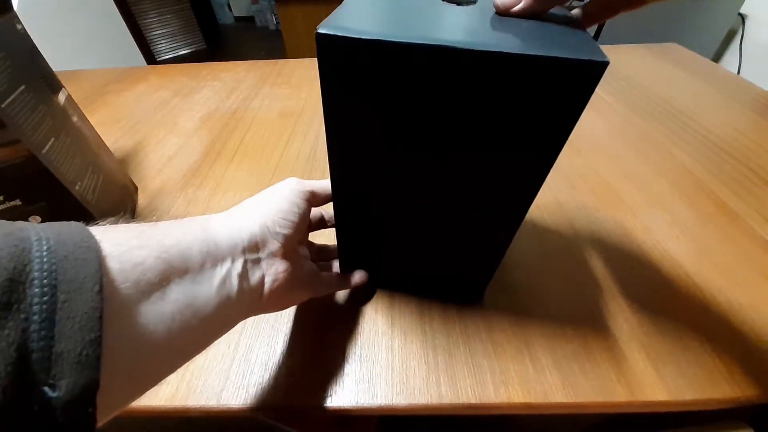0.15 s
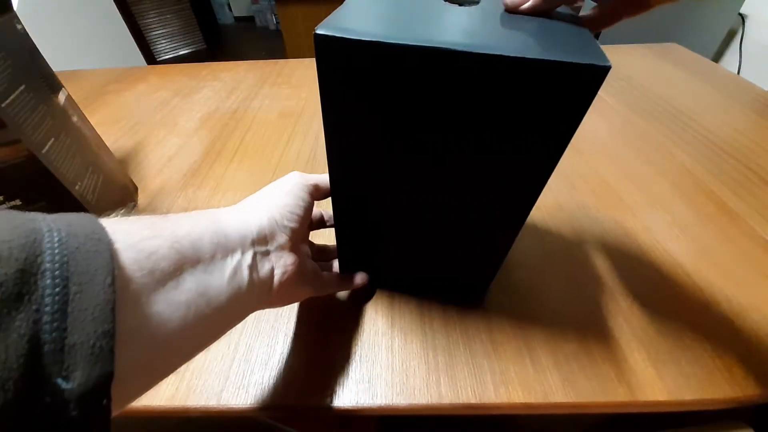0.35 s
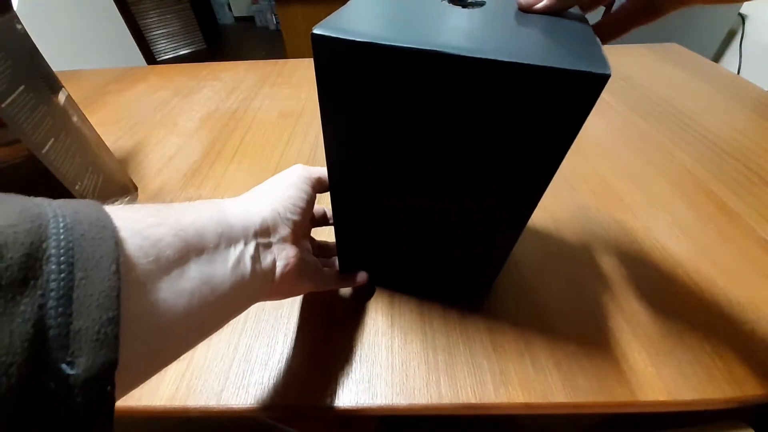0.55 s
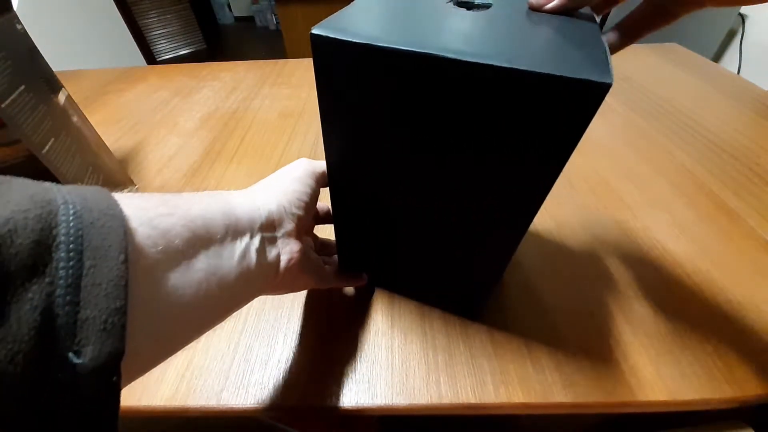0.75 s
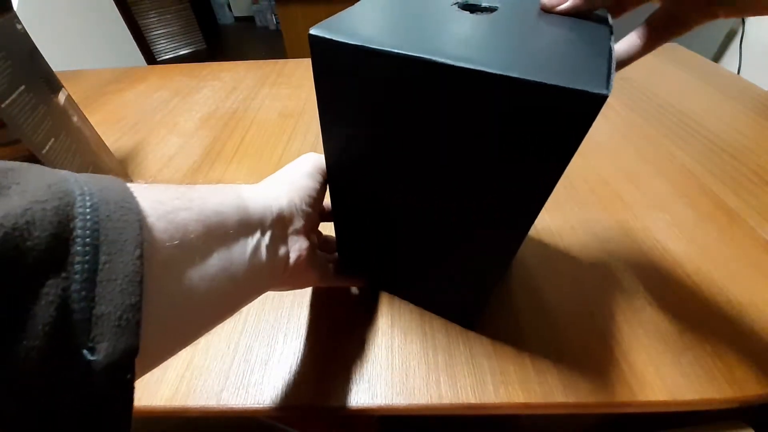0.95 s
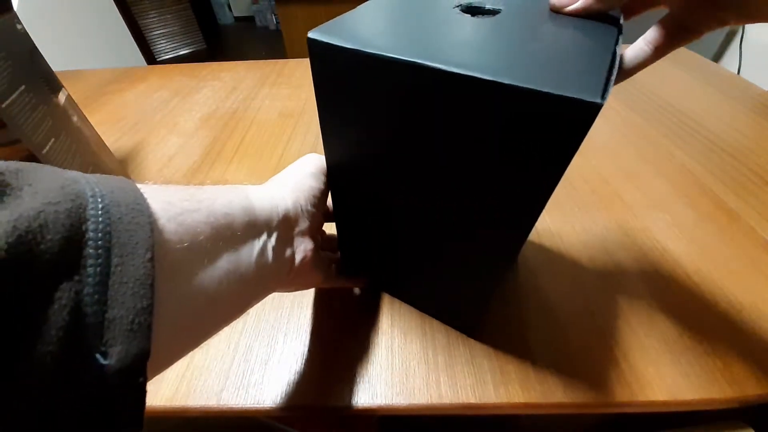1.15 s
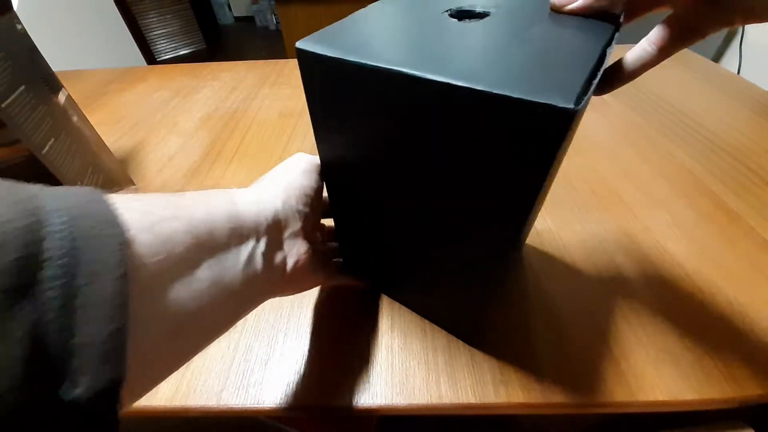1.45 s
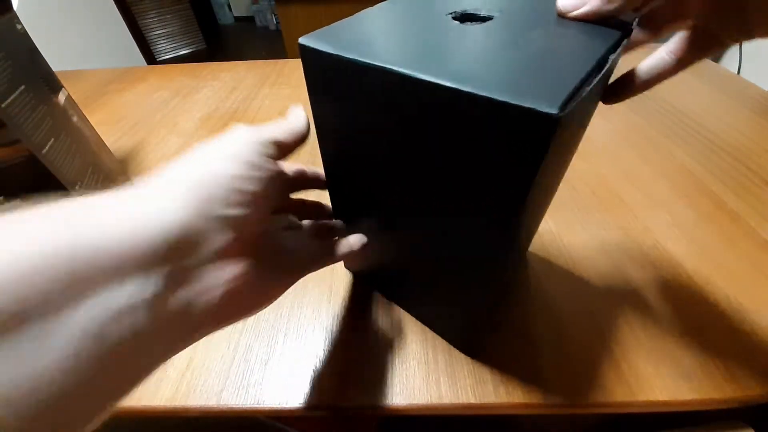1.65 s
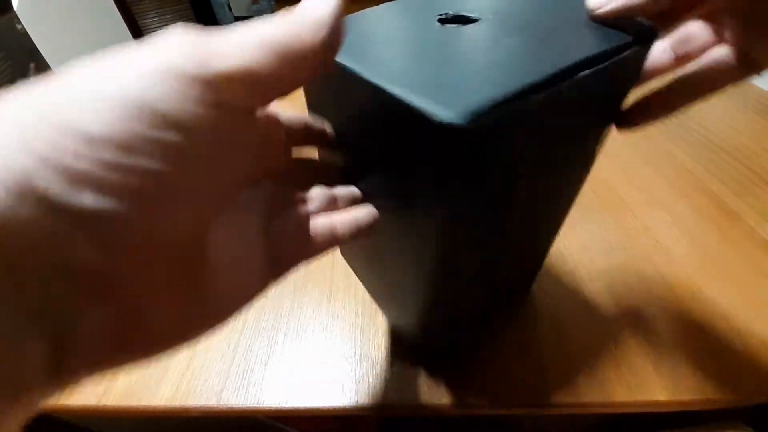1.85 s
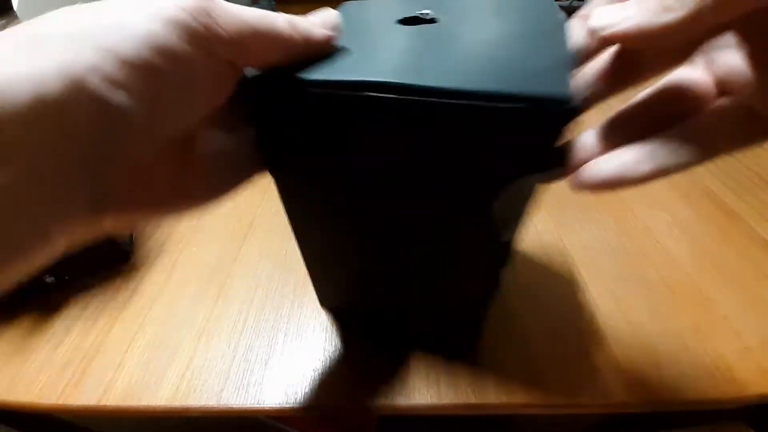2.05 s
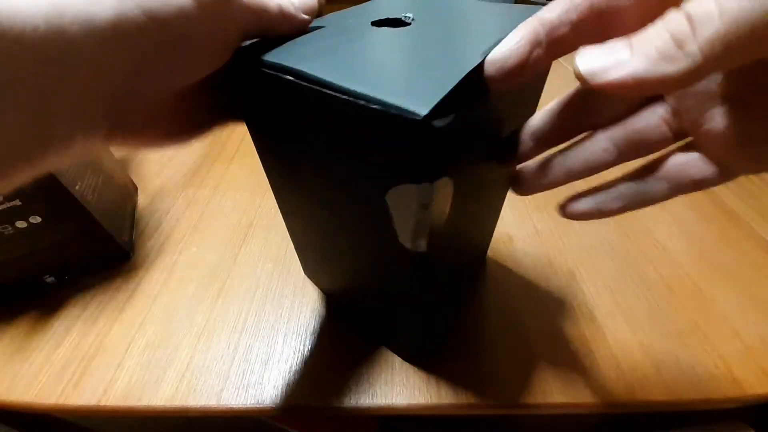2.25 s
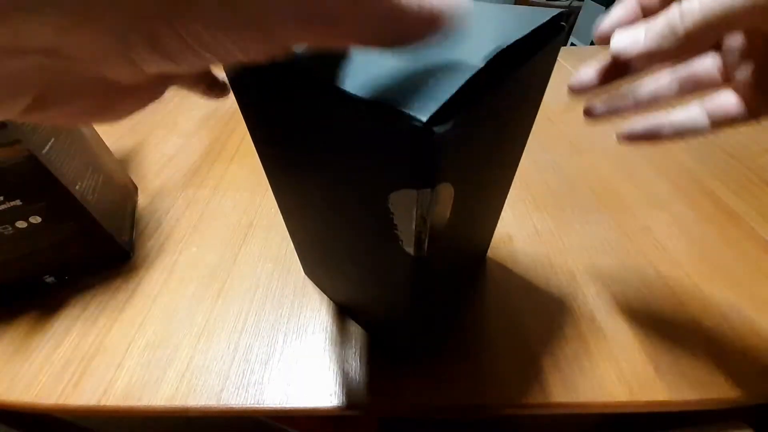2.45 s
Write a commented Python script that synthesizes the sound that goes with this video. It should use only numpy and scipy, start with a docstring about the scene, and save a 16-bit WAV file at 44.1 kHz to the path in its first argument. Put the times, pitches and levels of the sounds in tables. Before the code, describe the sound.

Close stereo microphone in a quiet small room: a stiff card box drags softly, knocks sharply, ticks at its edges, thuds and creaks on the table, then hands hiss across it and fade.

```python
"""A tall cardboard box is turned by hand on a wooden table, close to the microphone in a small room.
First the base drags and a hand brushes the card; then the box tips down with one sharp tap, and edges tick.
Midway the base thuds down and judders, the card creaks, and palms and fingers slide over it with a bright hiss.
A second tap and thud follow, then a last tick and fading strokes. Still air lies under it all.
Contacts are random impulses sent through the box; hisses are dense grains, thuds and creaks are sines."""
import sys
import numpy as np
from scipy import signal
from scipy.fft import rfft, irfft
from scipy.io import wavfile

SR = 44100
rng = np.random.default_rng(int(sys.argv[2]) if len(sys.argv) > 2 else 0)


def store_pcm(level_fs):
    """Save levels as 16-bit WAV."""
    pcm = np.round(np.clip(level_fs, -1, 1) * 32767).astype(np.int16)
    wavfile.write(sys.argv[1], SR, np.atleast_2d(pcm).T)


N = 114660
T = np.arange(N) / SR  # time [s]


def amp(db):
    """Decibels to gain."""
    return 10 ** (np.asarray(db) / 20)


def unit(x):
    """Scale to rms 1."""
    return x / np.sqrt(np.mean(x ** 2) + 1e-20)


def conv(x, response):
    """Pass a sound through a response, one row per channel."""
    return signal.fftconvolve(np.atleast_2d(x), np.atleast_2d(response), axes=1)[:, :N]


def colour(points, size=4096):
    """Causal (minimum-phase) response with the given spectrum, by folding the cepstrum."""
    hz, db = np.array(points, float).T
    bins = np.maximum(np.fft.rfftfreq(size, 1 / SR), 1)
    log_gain = np.log(amp(np.interp(np.log(bins), np.log(hz), db)))
    cepstrum = irfft(log_gain)
    cepstrum[1:size // 2] *= 2
    cepstrum[size // 2 + 1:] = 0
    return irfft(np.exp(rfft(cepstrum)))


def pan(db):
    """Left and right gains of constant power; db is left minus right."""
    return unit(amp(np.array([[db], [-db]]) / 2))


# how unlike the two channels are for sounds near the microphone: (frequency [Hz], side level [dB])
STEREO_WIDTH = [(100, -12), (350, -13.5), (700, -7), (1300, 1), (3000, 0.5), (16000, -1)]


def spread(middle, side):
    """Two unrelated sounds as one wide source, narrow in the bass."""
    return unit(middle + conv(side, colour(STEREO_WIDTH)) * np.array([[1], [-1]]))


def wide_noise(points):
    """Coloured stereo noise of rms 1."""
    return spread(*conv(rng.standard_normal((2, N)), colour(points)))


def grains(rate, scatter_db):
    """Random tiny impulses of either sign, rate per second, a few larger than the rest."""
    size = amp(scatter_db * np.minimum(rng.exponential(size=N), 4))
    present = rng.random(N) < rate / SR
    return present * size * rng.choice([-1, 1], N)


def walk(rate):
    """Random wander, with a spread near 1, along straight lines between rate new values per second."""
    return np.interp(T * rate, np.arange(N), rng.standard_normal(N))


def swell(at, rise, fall, shape=1.76):
    """Envelope that grows to a peak and dies away."""
    return np.exp(-(np.abs(T - at) / np.where(T < at, rise, fall)) ** shape)


# panel resonances of the box: (frequency [Hz], time to fall 60 dB [s], relative level [dB])
PANEL_MODES = [(160, 0.061, -3), (241.4, 0.083, -3.5), (318.7, 0.085, -3), (482, 0.073, -10.5),
               (568, 0.034, -2), (735, 0.022, -1), (940, 0.018, -14), (1273, 0.036, -1), (1686, 0.036, 0),
               (2215, 0.056, -2.5)]
PANEL_RING_DB = -35.5


def box(points, size=8192):
    """Response of the box to one contact: the push itself plus ringing panels."""
    t = T[:size]
    modes = sum(amp(db - 60 * t / t60) * np.cos(2 * np.pi * hz * t) for hz, t60, db in PANEL_MODES)
    response = amp(PANEL_RING_DB) * modes / 2
    response[0] += 1  # the push
    return conv(response, colour(points))[0, :size]


# spectrum of the still air in the room: (frequency [Hz], level [dB])
AIR_SPECTRUM = [(20, -16), (130, -5), (550, 10.5), (1100, -30), (4000, -32), (10000, -25), (16000, -16)]
AIR_DB = -67


def still_air():
    """Steady faint noise of the air around the microphone."""
    return amp(AIR_DB) * wide_noise(AIR_SPECTRUM)


# drag of the base over the table, before its random wander: (time [s], level [dB])
DRAG_LEVEL = [(0, -50), (.07, -58), (.115, -69), (.17, -49.5), (.43, -48.5), (.52, -50.5), (.6, -44),
              (.69, -55.5), (.81, -48), (.87, -56.5), (.96, -54.5), (1.13, -62), (1.31, -58), (1.38, -49.5),
              (1.46, -58), (1.6, -42), (1.7, -56), (1.88, -46.5), (1.99, -37.5), (2.08, -44.5),
              (2.22, -49.5), (2.3, -49), (2.38, -70.5)]
# spectrum of one catch of the base: (frequency [Hz], level [dB])
DRAG_SPECTRUM = [(30, -41), (65, -5.5), (170, -1), (300, 0), (420, -3), (620, 0), (950, -6), (2000, -15),
                 (7000, -36), (16000, -42)]
CATCHES_PER_S, CATCH_SCATTER_DB, DRAG_PAN_DB = 900, 2, -2
DRAG_WANDER_DB, DRAG_WANDER_PER_S = 2.85, 44.84


def drag():
    """The base catches and lets go hundreds of times a second, shaking the panels."""
    middle, side = (conv(grains(CATCHES_PER_S, CATCH_SCATTER_DB), box(DRAG_SPECTRUM)) for _ in range(2))
    level_db = np.interp(T, *np.array(DRAG_LEVEL).T) + DRAG_WANDER_DB * walk(DRAG_WANDER_PER_S)
    return spread(middle, side) * pan(DRAG_PAN_DB) * amp(level_db)


HAND_ECHO_S, HAND_ECHO_GAIN, HAND_WANDER = .0009, .5, .15  # typical lag, gain, wander of log lag


def hand_echo(x):
    """Sound bounces between card and moving hand, so its colour keeps shifting."""
    lags = HAND_ECHO_S * np.exp(HAND_WANDER * np.array([walk(10), walk(10)]))
    echo = np.array([np.interp(T - lag, T, side) for lag, side in zip(lags, x)])
    return unit(x + HAND_ECHO_GAIN * echo)


# hand strokes on the card, before flutter; the rasp is panned half as far as the hiss:
# (peak time [s], rise [s], fall [s], hiss level [dB], rasp level [dB], hiss left minus right [dB])
HAND_STROKES = [(.0, .02, 0.055, -56, -62.5, 0), (.56, 0.32, 0.14, -52, -58.5, -7),
                (.79, 0.08, 0.1, -53, -63.5, -5.5), (1.0, 0.11, 0.19, -57, -60, -7),
                (1.27, 0.028, 0.04, -69, -60, -16), (1.347, 0.006, 0.055, -47.5, -49, -3),
                (1.572, 0.11, 0.13, -41, -44.5, -0.5), (1.665, 0.0082, 0.016, -40.5, -53, 3),
                (1.764, 0.051, 0.093, -34, -41.5, 3), (2.008, 0.12, 0.093, -31, -45.5, 3.5),
                (2.171, 0.21, 0.07, -43.5, -43, -1.5), (2.334, 0.024, 0.022, -39, -55, 1),
                (2.38, 0.67, 0.18, -48, -70, 1.5), (2.535, 0.037, 0.056, -44, -65.5, -1),
                (2.595, .012, .02, -51, -55, -4)]
# spectrum of the fine hiss of the fibres: (frequency [Hz], level [dB])
HISS_SPECTRUM = [(200, -28), (2000, -22), (4400, -4), (6000, -8), (7400, -9), (8700, 1), (10300, -2),
                 (13000, 2.5), (16000, -3)]
# spectrum of the lower rasp: (frequency [Hz], level [dB])
RASP_SPECTRUM = [(80, -26), (300, -3.5), (600, 5), (1000, -0.5), (2500, 4), (3300, -5), (4500, -10.5),
                 (16000, -19)]
FIBRES_PER_S, FIBRE_SCATTER_DB, FLUTTER_DB = 30000, 0.5, 0.9
RASP_GRAINS_PER_S, RASP_SCATTER_DB = 2000, 3


def rubbed_card(rate, scatter_db, points):
    """Fibres plucked at random over a wide patch of card, heard past the moving hand."""
    middle, side = (conv(grains(rate, scatter_db), colour(points)) for _ in range(2))
    return hand_echo(spread(middle, side))


def strokes():
    """Skin plucks the fibres of the card: a fine hiss, and a lower, grainier rasp when it presses."""
    hiss = rubbed_card(FIBRES_PER_S, FIBRE_SCATTER_DB, HISS_SPECTRUM)
    rasp = rubbed_card(RASP_GRAINS_PER_S, RASP_SCATTER_DB, RASP_SPECTRUM)
    hiss_power = rasp_power = 0
    for at, rise, fall, hiss_db, rasp_db, pan_db in HAND_STROKES:
        speed = swell(at, rise, fall)
        hiss_power = hiss_power + (speed * amp(hiss_db) * pan(pan_db)) ** 2
        rasp_power = rasp_power + (speed * amp(rasp_db) * pan(pan_db / 2)) ** 2
    rubbing = hiss * np.sqrt(hiss_power) + rasp * np.sqrt(rasp_power)
    return rubbing * amp(FLUTTER_DB * walk(90))


ROOM_T60_S, ROOM_ONSET_S = 0.45, 0.01


def reflections(envelope):
    """Diffuse stereo response of unit energy per channel, building up over the onset time."""
    tail = spread(*rng.standard_normal((2, N))) * envelope * (1 - np.exp(-T / ROOM_ONSET_S))
    return tail / np.sqrt(np.sum(tail ** 2) / 2)


def wall_tail():
    """Reflections from the walls of the small room, dying away evenly in decibels."""
    return reflections(amp(-60 * T / ROOM_T60_S))


def room(x, db=-15):
    """A short diffuse tail from the walls."""
    return amp(db) * conv(x.mean(axis=0), wall_tail())


KNOCK_CYCLES, KNOCK_FOCUS_DB = 1, 3.5  # decay and strength of the struck spot


def knock(hz, body, size=4096):
    """The struck spot rings for about a cycle at its own pitch and shakes the whole box; peak 1."""
    cycles = T[:size] * hz
    spot = np.exp(-cycles / KNOCK_CYCLES)
    push = 2 * amp(KNOCK_FOCUS_DB) * spot / spot.sum() * np.cos(2 * np.pi * cycles)
    push[0] += 1
    sound = conv(push, body)
    return sound / np.abs(sound).max()


CLICK_DECAY_S, CLICK_SPLINTER = .0004, .5


def edge_crack():
    """The stiff edge gives one impulse and a splintering burst of noise; unit energy per channel."""
    decay = np.exp(-np.minimum(T / CLICK_DECAY_S, 20))
    crack = CLICK_SPLINTER * rng.standard_normal((2, N)) * decay
    crack[:, 0] = 1
    return crack / np.sqrt(np.sum(crack ** 2, axis=1, keepdims=True))


# blows on the box, direct sound before panning and reflections:
# (time [s], hollow knock level [dB], knock pitch [Hz], edge click level [dB], left minus right [dB])
BOX_BLOWS = [(0.1319, -36.5, 920, -70, -1), (0.1511, -27, 990, -14.5, -6.5), (0.2035, -15.5, 1290, 4, -13),
             (0.2053, -17, 553, -13, -5), (0.2985, -29.5, 507, -22.5, -7), (.425, -38, 250, -62, -7),
             (.576, -36, 400, -60, -15), (.606, -39, 300, -60, -1), (0.672, -60, 900, -26, -9),
             (0.7106, -60, 900, -22.5, -19), (0.7448, -29.5, 805, -52, -3.5), (.7769, -57, 900, -25.5, -27),
             (0.9017, -39.5, 800, -60, -2), (0.9257, -31.5, 800, -31, -2), (0.9548, -58, 900, -19, -7),
             (0.9685, -32, 860, -37, 0), (0.9903, -50, 900, -18.5, -10), (2.0004, -29.5, 298, -14.5, -15),
             (2.0337, -41, 900, -8, -22.5), (2.3643, -50, 910, -20.5, -1)]
# spectrum of the hollow knock: (frequency [Hz], level [dB])
KNOCK_SPECTRUM = [(40, -35), (150, -9), (350, 0), (560, 1.5), (850, -3), (1300, -2.5), (2200, -6),
                  (3000, -33.5), (6000, -34), (16000, -72)]
# spectrum of the edge click, relative: (frequency [Hz], level [dB])
CLICK_SPECTRUM = [(100, -13.5), (1500, -10), (4800, -8), (7000, -15), (8500, -5), (10700, 1), (12500, -4),
                  (16000, -8)]
SCATTER_DECAY_S = 0.0044  # early reflections from the table and nearby boxes
CLICK_SCATTER_DB, KNOCK_SCATTER_DB = -8.5, -9
CLICK_ROOM_DB, KNOCK_ROOM_DB = -12, -11.5


def blows():
    """Each blow gives a hollow knock and a brief crack of the stiff edge, scattered by the table and the walls."""
    body, edge = box(KNOCK_SPECTRUM), colour(CLICK_SPECTRUM)
    early, late = reflections(np.exp(-T / SCATTER_DECAY_S)), wall_tail()
    around_knock = signal.unit_impulse(N) + amp(KNOCK_SCATTER_DB) * early
    around_click = amp(CLICK_SCATTER_DB) * early + amp(CLICK_ROOM_DB) * late
    knocks, clicks = np.zeros((2, 2, N))
    for at, knock_db, hz, click_db, pan_db in BOX_BLOWS:
        i = int(at * SR)
        click = pan(pan_db) * edge_crack() + around_click
        clicks[:, i:] += amp(click_db) * click[:, :N - i]
        surroundings = pan(pan_db) * around_knock + amp(KNOCK_ROOM_DB) * late
        hollow = conv(surroundings[:, :SR // 2], knock(hz, body))[:, :N - i]
        knocks[:, i:i + hollow.shape[1]] += amp(knock_db) * hollow
    return knocks + conv(clicks, edge / np.sqrt(np.sum(edge ** 2)))


# rumble of the table top under shifting weight: (peak time [s], rise [s], fall [s], level [dB])
TABLE_BUMPS = [(1.46, 0.091, 0.12, -53), (2.01, 0.025, .04, -60)]
# spectrum of the rumble: (frequency [Hz], level [dB])
BUMP_SPECTRUM = [(20, -20), (38, 0), (68, -1), (120, -3), (220, -18), (1600, -75)]


def bumps():
    """Shifting weight makes the table top rumble."""
    level = sum(amp(db) * swell(at, rise, fall) for at, rise, fall, db in TABLE_BUMPS)
    return wide_noise(BUMP_SPECTRUM) * level


# fits of stick-slip judder, the rate before random gaps:
# (peak time [s], rise [s], fall [s], slips per second [1/s], level [dB], left minus right [dB])
JUDDER_FITS = [(1.6, 0.037, 0.029, 520, -34.5, 2), (1.38, 0.019, 0.028, 200, -53, -4.5)]
# spectrum of one slip: (frequency [Hz], level [dB])
JUDDER_SPECTRUM = [(35, -10), (100, 0), (160, 4), (420, -9.5), (950, 2), (1500, -5), (2400, -10),
                   (3200, -19), (5500, -30), (16000, -35)]


def judder(jitter=.5, scatter_db=1.5, smear_s=0.00035, smear=0.42):
    """Under more pressure the card sticks and slips in a quick uneven train; each slip is a tiny scrape."""
    out, body = 0, box(JUDDER_SPECTRUM)
    for at, rise, fall, rate, db, pan_db in JUDDER_FITS:
        trains = np.zeros((2, N))
        for train in trains:
            gaps, sizes = rng.standard_normal((2, 2048))
            times = np.cumsum(np.exp(jitter * gaps)) / rate
            inside = times < T[-1]
            train[(times[inside] * SR).astype(int)] = amp(scatter_db * sizes[inside])
        scrapes = conv(trains, np.exp(-T[:1024] / smear_s)) * rng.standard_normal((2, N))
        slips = spread(*conv(smear * scrapes - trains, body))
        out = out + slips * swell(at, rise, fall, shape=2.0) * amp(db) * pan(pan_db)
    return out


# the box settles on the table with a dull thud: (time [s], frequency [Hz], level before decay [dB])
TABLE_THUDS = [(1.379, 73, -37), (2.0013, 105, -29.5)]
THUD_CYCLES = 0.66  # decay, in cycles


def thuds():
    """The table top bounces for a cycle or two."""
    out = 0
    for at, hz, db in TABLE_THUDS:
        cycles = np.maximum(T - at, 0) * hz
        out = out + amp(db) * np.sin(2 * np.pi * cycles) * np.exp(-cycles / THUD_CYCLES)
    return out


# the card catches as it slides and chafes briefly around one pitch, before waver and roughness:
# (peak time [s], swell time [s], frequency [Hz], level [dB])
CARD_CREAKS = [(1.582, .005, 1485, -37), (1.6, 0.021, 980, -38), (1.602, .022, 151, -37.5),
               (1.603, .016, 316, -40), (1.621, .005, 2170, -38.5), (1.965, .008, 590, -37.5),
               (1.999, .009, 629.7, -32.5), (2.2965, 0.0055, 1480, -42.5), (2.298, 0.0074, 690, -41)]
CREAK_WAVER, CREAK_ROUGH, CREAK_CYCLES = .09, .45, 2  # share of pitch, share of strength, cycles per new value


def creaks():
    """Each catch drives one resonance unevenly: pitch and strength wander every few cycles."""
    out = 0
    for at, length, hz, db in CARD_CREAKS:
        pitch = hz * (1 + CREAK_WAVER * walk(hz / CREAK_CYCLES))
        strength = 1 + CREAK_ROUGH * walk(hz / CREAK_CYCLES)
        phase = 2 * np.pi * np.cumsum(pitch) / SR
        out = out + amp(db) * swell(at, length, length) * strength * np.sin(phase)
    return out


def scene():
    """All the handling noises in the room, over still air."""
    rubbing = drag() + strokes() + bumps() + judder() + thuds() + creaks()
    return still_air() + rubbing + room(rubbing) + blows()  # blows carry their own reflections


TOP_HZ, LOW_CUT_HZ = 16100, 32


def record(dry):
    """The recorder clips at full scale and cuts the deepest bass and the top."""
    clipped = np.clip(dry, -1, 1)
    low_cut = signal.butter(4, LOW_CUT_HZ, "high", fs=SR, output="sos")
    thin = signal.sosfilt(low_cut, clipped)
    top_cut = signal.firwin(255, TOP_HZ, fs=SR, window="blackman")
    return signal.fftconvolve(thin, top_cut[None], mode="same", axes=1)


dry = scene()
out = record(dry)
store_pcm(out)
```